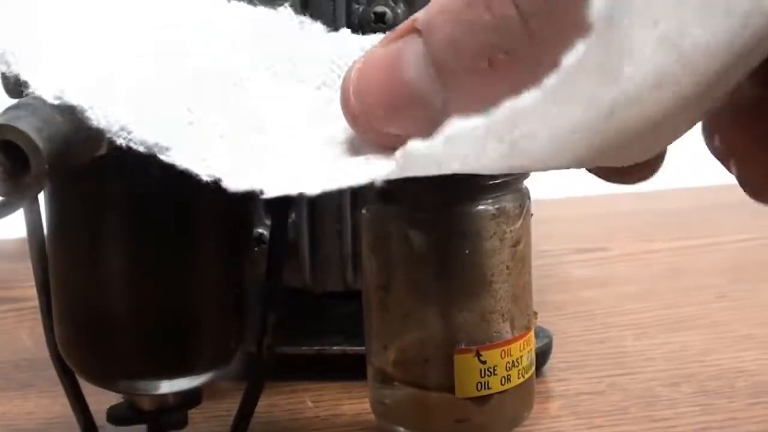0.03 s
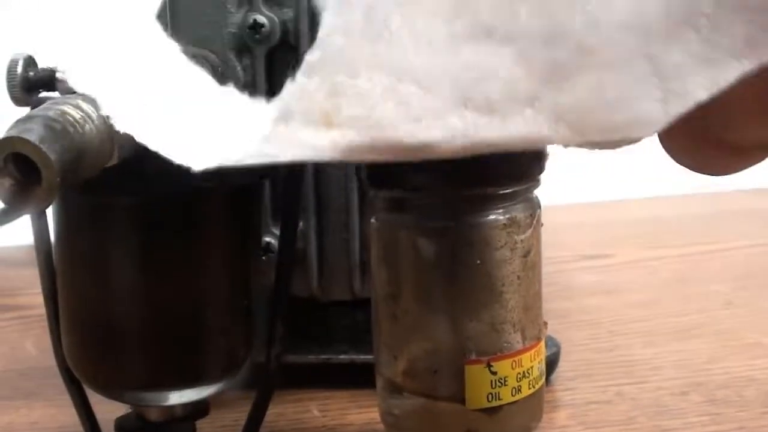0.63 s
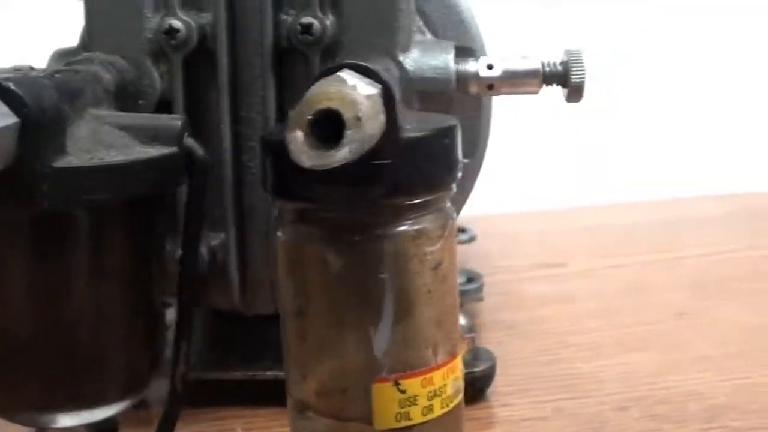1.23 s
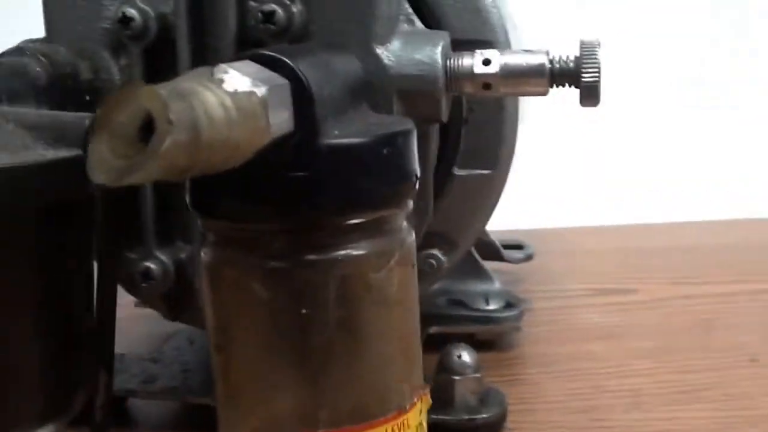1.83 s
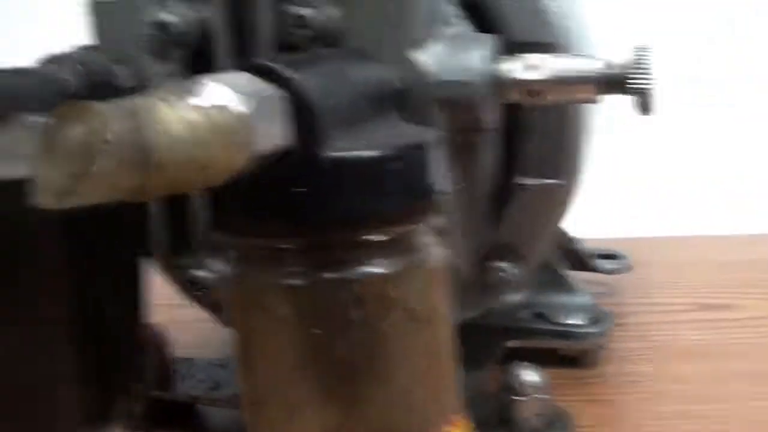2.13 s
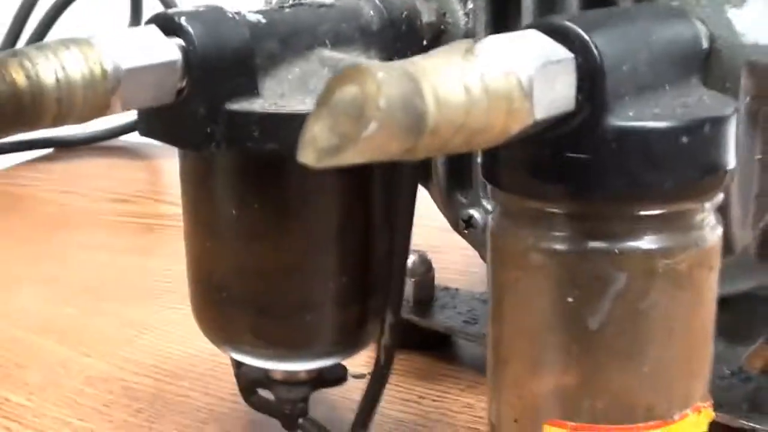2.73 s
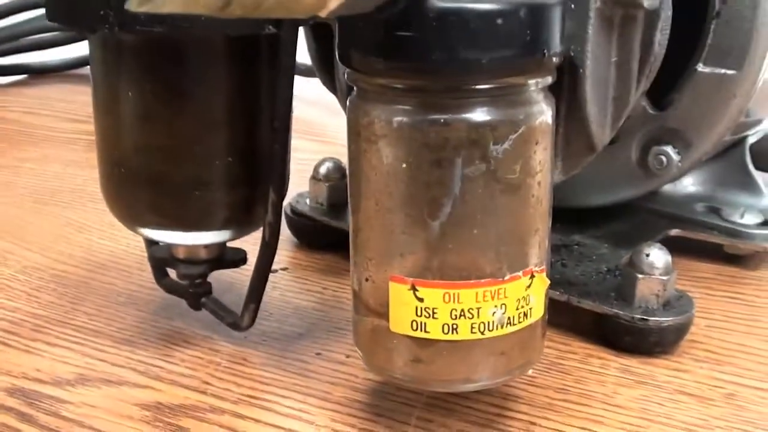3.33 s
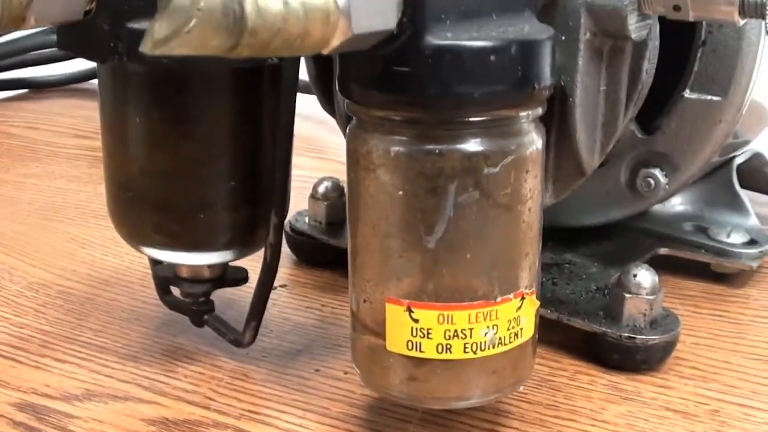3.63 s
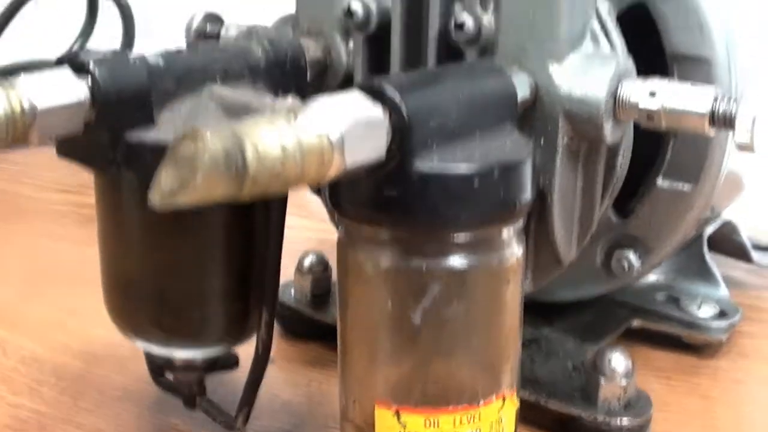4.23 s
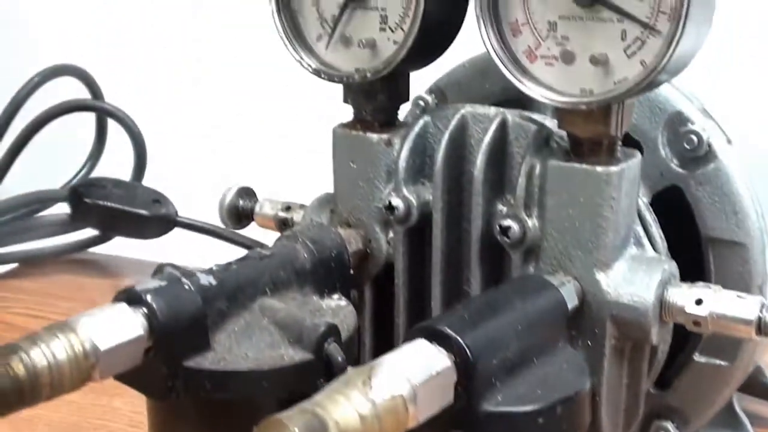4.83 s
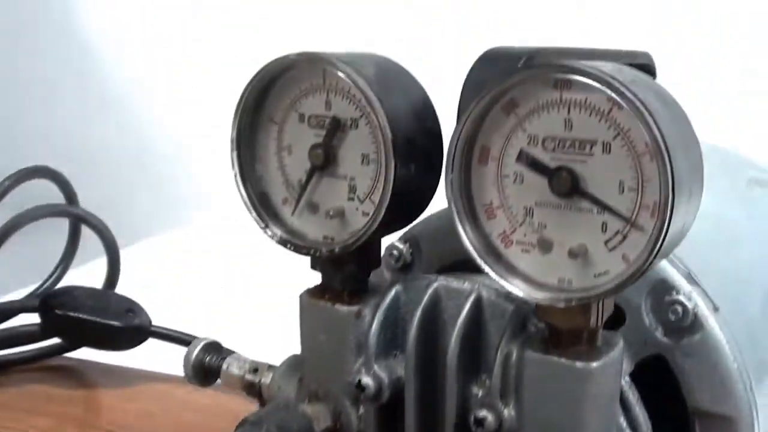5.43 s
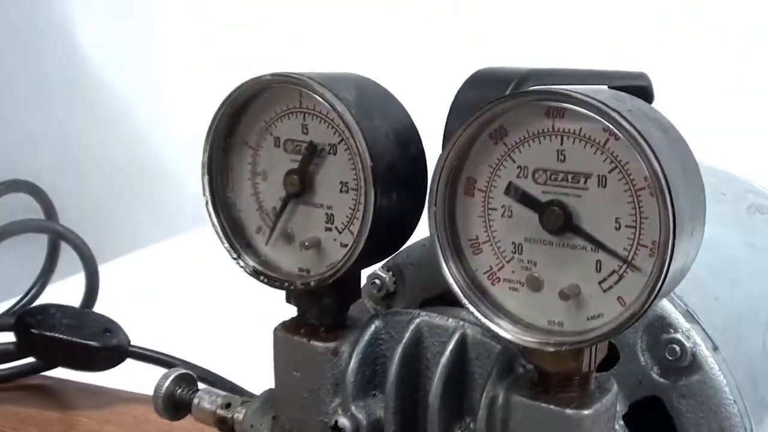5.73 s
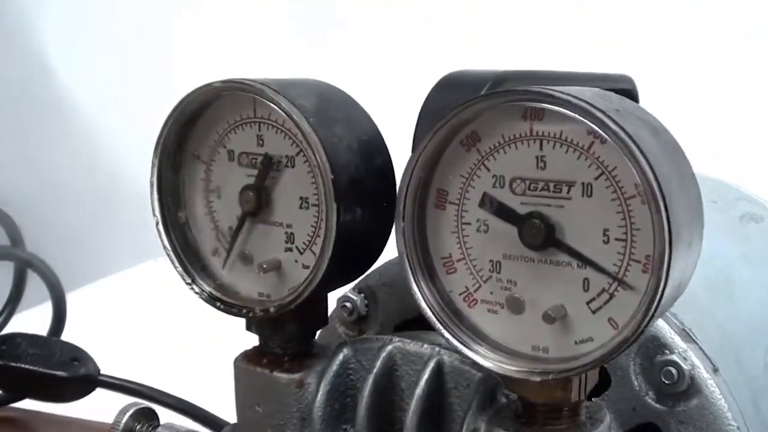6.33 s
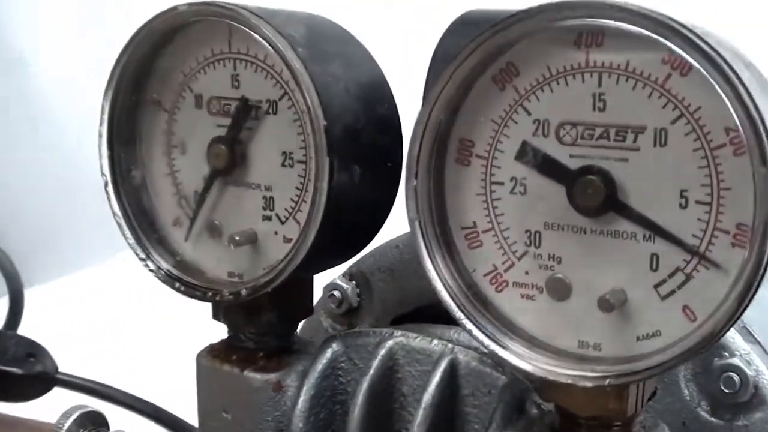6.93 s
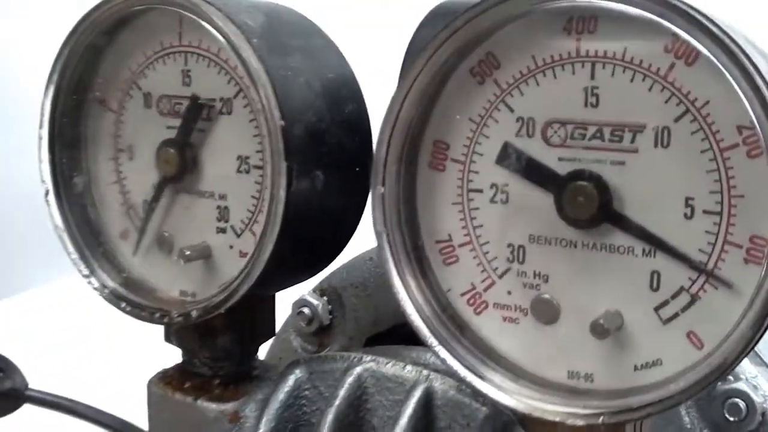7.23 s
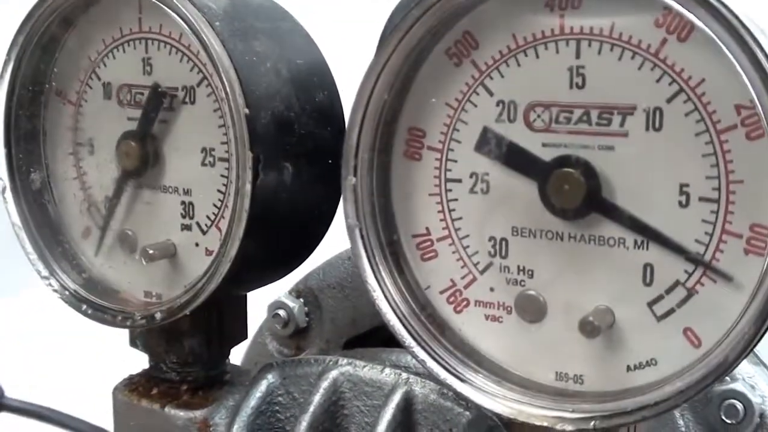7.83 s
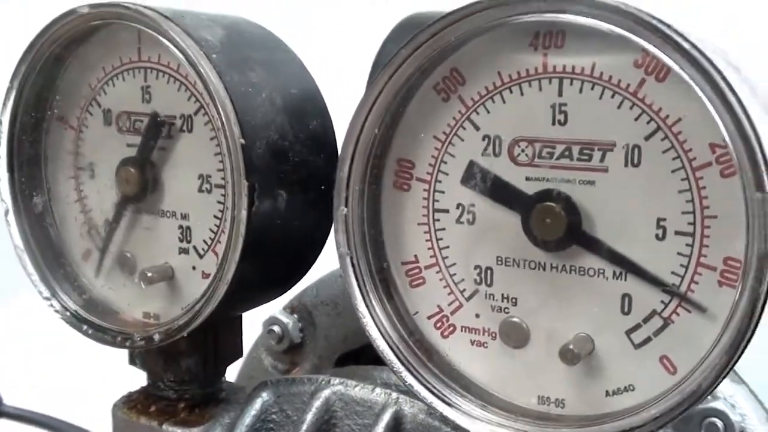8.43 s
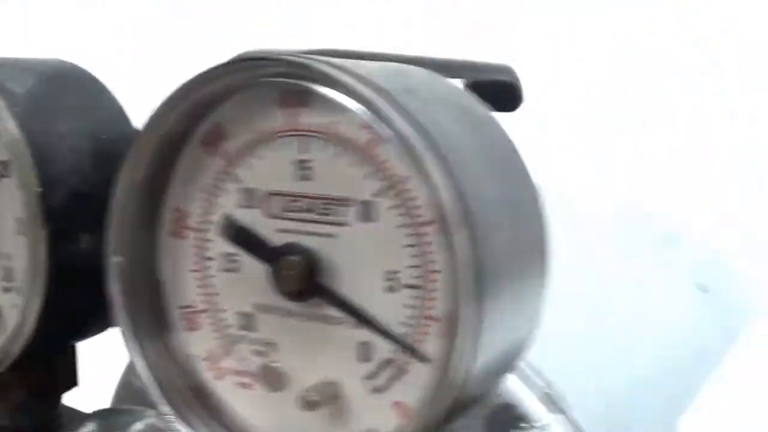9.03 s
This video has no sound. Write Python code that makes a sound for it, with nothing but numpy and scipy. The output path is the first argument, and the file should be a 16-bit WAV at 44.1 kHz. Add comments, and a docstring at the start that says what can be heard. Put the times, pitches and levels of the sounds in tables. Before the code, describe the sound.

An electric vacuum pump is already running on a table indoors and holds one speed for the whole nine seconds or so. The loudest sound is a low, buzzing drone made of very rapid air thumps. Each thump carries a spit of air, forming a bright, pulsing hiss with thin, high ringing from the jar and metal fittings. Beneath it are fast ticking and scraping, a faint wavering motor whine and a soft fan rush.

From the start until about 1.1 seconds, a paper towel flutters and rasps in the exhaust. The hiss sounds hollow and close until about 2 seconds, then is strongest around 3 to 4 seconds. From about 4.5 seconds the microphone rises away from the outlet; the hiss changes colour and the ticking grows a little clearer. The drone continues to the end, with slight room echo.

```python
"""On a wooden table, a four-vane vacuum pump blows out through an open hose barb on its oil jar.
Each turning vane lets out a thump and a spit of air, which hisses and rings the jar and fittings.
The vanes tick and scrape, the motor whines and a cooling fan rushes underneath.
A paper towel flutters in the exhaust for the first second; later the microphone moves
from the outlet up to the gauges."""
import sys
import numpy as np
from scipy import signal
from scipy.fft import rfft, irfft, next_fast_len
from scipy.io import wavfile
from scipy.ndimage import uniform_filter1d, map_coordinates

SR = 44100
rng = np.random.default_rng(int(sys.argv[2]) if len(sys.argv) > 2 else 0)


def unload_audio(sound):
    """Save the sound as a 16-bit wav file, at the path given as the first command line argument."""
    columns = np.transpose(np.atleast_2d(sound))
    # keep every value between -1 and 1, then stretch to whole-number steps
    steps = np.round(np.clip(columns, -1, 1) * 32767)
    wavfile.write(sys.argv[1], SR, steps.astype(np.int16))


N = 405719
TIME = np.arange(N) / SR


# How many vanes pass the exhaust each second: time_s, rate_hz
VANE_RATE = [(0, 117.72), (1.5, 117.9), (5, 117.98), (9.2, 117.88)]
# How the four vanes differ: tick_lag_ms, tick_level_db, thump_lag_ms
VANES = [(-0.4, -4, -0.0076), (-0.072, -3.5, -0.034), (-0.22, -5, -0.023), (-0.52, -1.5, 0.0091)]
def rotor():
    """The motor turns the vanes; one after another they uncover the exhaust."""
    (rate_hz,) = curves(VANE_RATE)
    passes = 1 / 6 + np.cumsum(rate_hz) / SR
    count = np.arange(1, int(passes[-1]) + 1)
    times = np.interp(count, passes, TIME)
    return rate_hz, passes, times, np.array(VANES)[count % len(VANES)].T


# Tone of one thump through jar and outlet: pitch_hz, ahead_db, aside_db
THUMP_TONE = [(30.2, -61, -50), (69.6, -25, -49), (109.4, -6.5, -6), (213, 7, 6), (349, 7, 5),
              (483, 0.5, -4), (623, -1, -11.5), (610, -11, -35.5), (842, -9.5, -11.5), (1030, -22, -39),
              (1353, -12.5, -26), (1980, -39.5, -25.5), (4900, -60.5, -65)]
# How the drone of thumps swells and fades: time_s, level_db
DRONE_LEVEL = [(0.0, -28), (0.07, -29), (0.51, -28.5), (0.61, -30), (1.69, -28.5), (2.0, -31),
               (3.56, -28.5), (4.28, -30), (7.66, -30), (7.84, -29.5), (7.92, -31.5), (8.43, -29),
               (8.71, -32), (8.76, -30), (9.17, -29.5), (9.2, -32)]
def thumps(times, facing, boost_db=.24):
    """Each chamber empties with a push of air, never quite the same; together they make a drone."""
    timing, size = rng.standard_normal((len(times), 2)).T
    pulses = clicks(times + .028 * timing / 1000, .6 * size)
    tone = np.array(THUMP_TONE)
    ahead, aside = (unit_in(colour(pulses, tone[:, [0, k]]), 180, 430) for k in (1, 2))
    surge_db = .52 * wobble(19)  # the flow is a little uneven
    return (facing * ahead + (1 - facing) * aside) * loudness(DRONE_LEVEL) * undb(surge_db + boost_db)


# Puffs that come out harder: start_s, level_db
HARD_PUFFS = [(2.79, 5), (3.82, 4), (4.43, 6), (7.555, 6), (8.439, 6), (8.546, 3)]
def sputters():
    """Now and then the outlet gives a small dull pop that rings the housing."""
    tone = [(60, -16), (150, -4), (300, 0), (550, -4), (1100, -9), (1950, -19), (2160, 0),
            (2400, -16), (5000, -32)]
    return colour(clicks(*np.transpose(HARD_PUFFS)), tone)


def spits(times, fall_s, leak, rise_s=.00048, scatter_db=2):
    """How hard the air swirls: it bursts out with each vane, then dies down to a steady leak."""
    t = TIME[:SR // 50]
    burst = (1 - np.exp(-t / rise_s)) * np.exp(-t / fall_s)
    starts = clicks(times, scatter_db * rng.standard_normal(len(times)))
    return signal.oaconvolve(starts, burst / burst.max())[:N] + leak


# Tone of the air jet at the outlet's mouth, in front of it and from above: pitch_hz, level_db
JET_CLOSE = [(300, -6), (850, 4), (1250, -5.5), (2000, -7), (3300, 1.5), (4450, -5), (4700, -6),
             (5100, 0.5), (5750, -3), (6350, 1), (6650, -12), (7000, -4), (7550, -4), (8050, 9),
             (8650, 2.5), (9300, 1.5), (10150, -1), (10750, -3.5), (11200, -8), (11550, -3), (12000, -14),
             (12550, -2), (13700, -5), (14200, -10)]
JET_FRONT = [(300, -13), (850, -7.5), (1250, -4.5), (2050, -13), (2550, -4.5), (2950, -14), (3450, -5.5),
             (4600, -15), (5400, -0.5), (6400, -10.5), (7100, -3), (7800, 3), (9000, 0), (9500, -1.5),
             (10200, -8), (10800, -11), (11300, -6), (13500, -17), (14300, -21), (15000, -29)]
JET_ABOVE = [(300, -19), (1200, -12), (1800, -6), (2700, -8), (3600, -6.5), (4700, -1.5), (5600, -10),
             (7150, 7.5), (7600, 1.5), (8700, -1.5), (9600, 3.5), (10900, 4.5), (11700, -4), (13600, -8),
             (15000, -34)]
# How the hiss swells and fades: time_s, level_db
HISS_LEVEL = [(0.0, -40), (0.13, -55), (0.71, -46), (1.6, -44.5), (2.5, -46), (3.0, -39.5), (4.0, -38.5),
              (4.25, -44), (5.51, -41), (8.56, -43.5), (9.2, -42)]
def jet(times, height, boost_db=.8):
    """Air hisses out of the outlet: hollow up close, then changing tone with the listening height."""
    air = eddies(spits(times + .00027, fall_s=.0012, leak=.21, rise_s=.00014))
    tones = JET_CLOSE, JET_FRONT, JET_ABOVE
    close, front, above = (unit_in(colour(air, tone), 6600, 8920) for tone in tones)
    near = held(-np.inf, end_s=2.2, move_s=.6)  # the microphone draws away from the mouth
    far = (1 - height) * front + height * above
    return (near * close + (1 - near) * far) * loudness(HISS_LEVEL) * undb(boost_db)


# How loud the housing rings: time_s, level_db
HOUSING_LEVEL = [(0.05, -47), (0.33, -49), (0.45, -44.5), (0.7, -51), (1.1, -55), (1.7, -55), (2.6, -52),
                 (3.1, -68), (4.0, -59), (4.4, -50.5), (5.0, -49), (5.35, -45), (6.4, -47.5), (7.0, -51),
                 (9.2, -50.5)]
def housing_ring(spit):
    """The spits of air ring the pump's housing."""
    return blown_ring(spit, hz=2158, width_hz=112) * loudness(HOUSING_LEVEL)


# How loud the oil jar rings: time_s, level_db
JAR_LEVEL = [(0.3, -50), (0.8, -46), (1.35, -53), (1.8, -47), (2.7, -46), (3.35, -42.5), (4.0, -45),
             (4.7, -48), (5.2, -58), (5.7, -50), (6.2, -52), (6.7, -48), (7.6, -56), (8.2, -53), (8.7, -60),
             (9.1, -52)]
def jar_ring(spit, scrape, hz=3752, width_hz=112):
    """Air and scraping ring the oil jar, which also sings in step with the vanes."""
    sung = ring(steep_ring(spit, hz, width_hz), hz, 10 * width_hz)
    blown = blown_ring(spit, hz, width_hz)
    scraped = steep_ring(scrape, hz, width_hz)
    return unit(blown + .45 * scraped + .19 * sung) * loudness(JAR_LEVEL)


# How loud the elbow rings: time_s, level_db
ELBOW_LEVEL = [(0.3, -58), (0.85, -51), (1.3, -44), (1.65, -50), (2.4, -46), (4.0, -54), (4.7, -51),
               (5.5, -45.5), (6.3, -46), (7.1, -49), (8.55, -49.5), (8.9, -41.5), (9.2, -41.5)]
def elbow_ring(spit):
    """The spits of air ring the bend in the pipe."""
    return blown_ring(spit, hz=5165, width_hz=170) * loudness(ELBOW_LEVEL)


# How loud the gauge stems ring as the microphone rises past them: time_s, level_db
STEM_LEVEL = [(0.3, -55), (1.9, -53), (2.3, -53), (4.0, -56), (4.5, -48.5), (5.5, -47), (6.3, -51),
              (9.2, -51)]
def stem_ring(spit, scrape, hz=4228, width_hz=88):
    """Air and scraping ring the stems of the gauges."""
    blown = blown_ring(spit, hz, width_hz)
    scraped = steep_ring(scrape, hz, width_hz)
    return unit(blown + .75 * scraped) * loudness(STEM_LEVEL)


# Small hollows in the fittings: pitch_hz, width_hz, front_db, halfway_db, above_db
HOLLOWS = [(1090, 81, -75, -59, -46), (1740, 200, -65, -56, -59), (3240, 210, -77, -53.5, -50.5),
           (6280, 240, -63, -45.5, -48.5), (6890, 330, -50.5, -46.5, -66)]
def hollow_rings(spit, height):
    """Small hollows ring faintly, each loudest from its own direction; the towel muffles them."""
    rings = sum(blown_ring(spit, hz, width) * heard_from(height, db) for hz, width, *db in HOLLOWS)
    muffle_db = sum(db * held(start, end, TOWEL_MOVE_S) for start, end, _, db in TOWEL_HOLDS)
    return rings * undb(muffle_db)


# How the hose barb's ring swells and fades: time_s, level_db
BARB_LEVEL = [(0.0, -47), (0.25, -52), (0.56, -43), (1.15, -44), (1.5, -50), (1.71, -41), (2.7, -44.5),
              (2.92, -52), (3.23, -46), (4.0, -53), (4.4, -41.5), (4.82, -45), (5.2, -58), (5.6, -48),
              (6.3, -44), (6.8, -45), (7.3, -49.5), (8.4, -43.5), (8.94, -45), (9.2, -51)]
def barb_ring(spit, boost_db=2):
    """The hose barb, a short open nozzle, rings along its length."""
    return blown_ring(spit, hz=6062, width_hz=130) * loudness(BARB_LEVEL) * undb(boost_db)


# The outlet's sizzle, pushed higher by the towel: time_s, pitch_hz, level_db
SIZZLE = [(0.0, 12900, -48), (0.3, 13250, -54), (0.5, 12800, -46), (0.8, 12700, -46), (1.2, 12800, -50),
          (1.65, 12750, -50), (1.9, 12800, -60), (2.4, 12300, -49), (2.7, 12750, -54), (4.3, 12900, -54),
          (4.65, 12750, -51), (5.1, 12600, -52), (5.35, 12900, -53), (6.9, 12780, -59), (7.3, 12750, -57),
          (7.8, 12750, -65), (9.2, 12750, -54)]
def sizzle(spit, upper_hz=13650, width_hz=400, boost_db=.5):
    """Air rings across the narrow outlet at two very high pitches; the lower one glides."""
    hz, db = curves(SIZZLE)
    upper = ring(ring(eddies(spit), upper_hz, width_hz), upper_hz, width_hz)
    lower = gliding_ring(spit, hz, width_hz)
    return (lower + undb(-5) * upper) * undb(db + boost_db)


# The jet's wandering ring, broad rush and thin top: time_s, pitch_hz, level_db
JET_WANDER = [(0.35, 5370, -56), (0.7, 5560, -50), (1.3, 5630, -51), (1.8, 5540, -53), (2.4, 5460, -51),
              (3.5, 5440, -50), (4.5, 5410, -48.5), (6.2, 5380, -51.5), (9.2, 5300, -52)]
JET_RUSH = [(0.3, 8640, -50), (0.7, 8600, -45), (1.35, 8400, -46.5), (1.8, 8500, -42.5), (2.5, 8360, -40.5),
            (2.8, 8550, -51), (2.95, 8950, -50), (4.0, 8700, -42.5), (4.6, 8770, -41), (5.5, 8670, -39.5),
            (6.5, 8800, -40), (7.6, 8600, -40.5), (8.6, 8630, -41), (9.1, 8550, -52)]
JET_TOP = [(0.4, 10730, -46), (0.75, 10500, -55), (1.6, 10500, -48.5), (2.75, 10770, -45),
           (3.3, 10800, -57), (4.0, 10800, -47), (4.3, 10570, -45), (5.4, 10500, -48), (6.5, 10160, -47),
           (6.85, 10900, -54), (8.8, 10800, -50), (9.15, 10800, -44)]
def jet_rings(spit):
    """Three bands of the jet's hiss swell and shift as the microphone moves."""
    out = 0
    for table, width_hz in (JET_WANDER, 260), (JET_RUSH, 600), (JET_TOP, 420):
        hz, db = curves(table)
        out += gliding_ring(spit, hz, width_hz) * undb(db)
    return out


# Tone of the ticks through the casing: pitch_hz, level_db
TICK_TONE = [(200, -29), (550, -14.5), (800, 2), (980, -4), (1120, -1), (1300, 0), (1500, -1.5),
             (1720, -0.5), (2000, -16.5), (2600, -3.5), (4000, -20), (9000, -45)]
def ticks(times, vane_db, height):
    """The vanes slap the chamber wall in a pattern that repeats with every turn."""
    timing, size = rng.standard_normal((len(times), 2)).T
    slaps = clicks(times + .022 * timing / 1000, vane_db + 1.2 * size)
    return unit_in(colour(slaps, TICK_TONE), 840, 3200) * heard_from(height, db=(-51, -55.5, -43))


# Tone of the scraping through the casing: pitch_hz, level_db
SCRAPE_TONE = [(200, -10), (400, 3), (600, 1), (900, -1), (1400, -4), (1800, -4), (2000, -12), (2500, -13),
               (3200, -8), (4500, -9), (7000, -24)]
def scraping(passes, times):
    """Vanes drag over the same rough spots each turn; gives the bare scrape and its muffled sound."""
    drag = spits(times - .0004, fall_s=.0012, leak=.2, rise_s=.0002, scatter_db=.7)
    turns = passes / len(VANES)
    wall = rng.standard_normal(int(N / turns[-1]))  # the bumps of one full turn
    bumps = map_coordinates(wall, [turns % 1 * len(wall)], order=3, mode="mirror")
    scrape = unit(drag * bumps)
    return scrape, unit(colour(scrape, SCRAPE_TONE)) * undb(-47)


# Tones of the motor and bearings: pitch_hz, front_db, above_db
WHINE_TONES = [(796, -59, -61), (1073, -66, -58), (1096, -60, -55.5), (1120, -63, -62), (1149, -64, -63),
               (1179, -59, -60), (1268, -58, -63), (1357, -63, -67), (1415, -58, -56), (1435, -63, -69),
               (1533, -58, -56), (1651, -63, -60), (1676, -64, -56), (1698, -66, -57.5), (1768, -64, -57),
               (1879, -64, -72), (1887, -72, -57)]
def whine(rate_hz, height):
    """The motor's wavering tones follow the speed of the shaft."""
    phase_per_hz = 2 * np.pi * np.cumsum(rate_hz / rate_hz.mean()) / SR
    out = 0
    for hz, front_db, above_db in WHINE_TONES:
        tone = np.sqrt(2) * np.sin(hz * phase_per_hz + .3 * wobble(12))
        out += tone * undb(2 * wobble(7) + front_db + height * (above_db - front_db))
    return out


TOWEL_MOVE_S = .064  # time the hand takes to move the paper in or away
# When the towel is held in the exhaust: start_s, end_s, rasp_db, muffle_db
TOWEL_HOLDS = [(0.09, 0.52, -45, -6.5), (0.52, 1.087, -50, -1)]
# How loud the towel's low flutter is: time_s, level_db
FLUTTER_LEVEL = [(0, -42), (.12, -46), (.33, -46), (.45, -41.5), (.77, -41.5), (.86, -45), (.92, -40.5),
                 (1.02, -42), (1.17, -57), (1.4, -100)]
def towel(times):
    """The exhaust shakes the paper in low gusts; held close, it rasps and buzzes with every puff."""
    gust_tone = [(20, -14), (50, 0), (90, 5), (160, 6), (280, .5), (600, -13), (2000, -48)]
    paper_tone = [(200, -14), (740, 8), (1000, -5), (1150, 3.5), (1700, 0), (1950, -6), (2170, -3),
                  (2550, -23), (3250, -3), (4200, -2), (4700, -12), (7800, -9), (9600, 4), (12000, -23)]
    gusts = unit(colour(rng.standard_normal(N), gust_tone))
    air = unit(eddies(spits(times, fall_s=.0042, leak=.26)))
    slaps = unit(clicks(times + .000505, rng.standard_normal(len(times))))
    rasp = unit(colour(air + .73 * slaps, paper_tone))
    flutter = gusts * loudness(FLUTTER_LEVEL) * undb(2 * wobble(30.3))
    holding = sum(held(start, end, TOWEL_MOVE_S) * undb(db) for start, end, db, _ in TOWEL_HOLDS)
    return flutter + rasp * holding


# Tone of the fan and the shaking table: pitch_hz, level_db
FAN_TONE = [(20, -28), (45, -28), (70, -16), (120, -10.5), (300, -4), (550, -10), (750, -15.5), (1000, -17),
            (4000, -20), (9000, -23), (12000, -32)]
def fan():
    """The cooling fan rushes softly over the dull shaking of the table."""
    wash = unit(colour(rng.standard_normal(N), FAN_TONE))
    return wash * undb(-44.7 + 1.6 * wobble(20))


def near_echo(x, facing, aside_ms=.458, ahead_ms=.194, share=.36):
    """The nearest echo comes later as the microphone leaves the line of the outlet."""
    lag_ms = aside_ms + facing * (ahead_ms - aside_ms)
    late = map_coordinates(x, [np.arange(N) - lag_ms * SR / 1000], order=3)
    return (x + share * late) / np.hypot(1, share)


def room(x, wet_db, spread, early_s=.016, tail_db=-14, tail_s=.62, shift_s=1.2):
    """Table and walls add echoes that shift as the microphone moves; spread widens them."""
    t = TIME[:SR // 3]
    fade = (np.exp(-t / early_s) + undb(tail_db - 60 * t / tail_s)) * (t > .001)
    wet = np.zeros((2, N + len(t)))
    step = int(shift_s * SR)
    for centre in range(0, N + step, step):  # each echo pattern blends into the next
        mid, side = rng.standard_normal((2, len(t))) * fade / np.sqrt(np.sum(fade ** 2))
        echoes = np.array([mid + spread * side, mid - spread * side]) / np.hypot(1, spread)
        near = np.arange(max(centre - step, 0), min(centre + step, N))
        piece = x[near] * np.cos(np.pi / 2 * (near - centre) / step)
        echoed = signal.fftconvolve(piece[None], echoes, axes=1)
        wet[:, near[0]:near[0] + echoed.shape[1]] += echoed
    return (x + undb(wet_db) * wet[:, :N]) / np.hypot(1, undb(wet_db))


def left_first(x, phase_rad=.23):
    """What to add to a sound so it reaches the left a little early and the right a little late."""
    wave = signal.hilbert(x, next_fast_len(N))[:N]
    return np.real(wave * np.exp(.5j * phase_rad * np.array([[1], [-1]]))) - x


def lean_left(x, pan_db, bass_hz=230):
    """Make the left side louder, leaving the bass in the middle."""
    bass = signal.sosfiltfilt(signal.butter(2, bass_hz, fs=SR, output="sos"), x)
    return bass + (x - bass) * undb(np.array([pan_db, -pan_db]) / 2)


def eddies(strength):
    """Swirling air: fresh noise that follows the given strength."""
    return strength * rng.standard_normal(N)


def ring(x, hz, width_hz):
    """Make a sound ring around one pitch, at level 1."""
    return unit(signal.lfilter(*signal.iirpeak(hz, hz / width_hz, SR), x))


def steep_ring(x, hz, width_hz):
    """A ring that lets less through on either side of its pitch."""
    return ring(ring(x, hz, width_hz), hz, 5 * width_hz)


def blown_ring(spit, hz, width_hz):
    """Trapped air rings when the spits blow on it."""
    return steep_ring(eddies(spit), hz, width_hz)


def gliding_ring(spit, hz, width_hz):
    """A blown ring whose pitch moves: shift the noise down, smooth it, shift it back."""
    spin = np.exp(2j * np.pi * np.cumsum(hz) / SR)
    band = signal.lfilter(*signal.butter(2, width_hz / 2, fs=SR), eddies(spit) / spin)
    return unit(np.real(spin * band))


def colour(x, tone, size=4096):
    """Shape a sound with a list of (pitch_hz, level_db) points."""
    hz, db = np.transpose(tone)
    f = np.maximum(np.fft.rfftfreq(size, 1 / SR), 1)
    cepstrum = irfft(np.log(undb(np.interp(np.log(f), np.log(hz), db))))
    cepstrum[1:size // 2] *= 2  # folded so the filter rings only after a hit
    cepstrum[size // 2 + 1:] = 0
    return signal.oaconvolve(x, irfft(np.exp(rfft(cepstrum))))[:N]


def clicks(times, db, order=8):
    """Clean clicks at exact times, even between samples."""
    at = times[:, None] * SR
    index = np.floor(at).astype(int) + np.arange(1 - order, order + 1)
    shape = np.sinc(index - at) * np.sinc((index - at) / order) * undb(db)[:, None]
    inside = (index >= 0) & (index < N)
    return np.bincount(index[inside], shape[inside], N)


def wobble(rate_hz):
    """A smooth random drift, about 1 in size."""
    hold = int(SR / rate_hz)
    steps = np.repeat(rng.standard_normal(N // hold + 1), hold)
    return unit(uniform_filter1d(uniform_filter1d(steps, hold), hold)[:N])


def held(start_s, end_s, move_s):
    """Rise to 1 at the start, hold, and fall at the end."""
    return np.clip(np.minimum(TIME - start_s, end_s - TIME) / move_s + .5, 0, 1)


def heard_from(height, db):
    """Gain at the microphone's height, from the levels in front, halfway up and above."""
    return undb(np.interp(height, [0, .5, 1], db))


def curves(table):
    """Join a table's rows with straight lines in time."""
    time_s, *columns = np.transpose(table)
    return [np.interp(TIME, time_s, column) for column in columns]


def loudness(table):
    """Turn (time_s, level_db) rows into a changing gain."""
    return undb(curves(table)[0])


def undb(db):
    """Turn decibels into a gain."""
    return 10 ** (np.asarray(db) / 20)


def unit(x):
    """Scale a sound to an average (rms) level of 1."""
    return x / np.sqrt(np.mean(x ** 2))


def unit_in(x, low_hz, high_hz, size=2 ** 19):
    """Scale a sound so the part between two pitches has level 1."""
    f = np.fft.rfftfreq(size, 1 / SR)
    power = np.abs(rfft(x, size)[(f > low_hz) & (f < high_hz)]) ** 2
    return x / np.sqrt(power.sum() / (size // 2) / N)


# Where the microphone is: time_s, height (0 outlet, 1 gauges), facing (0 aside, 1 ahead of the outlet)
MICROPHONE_PATH = [(0, 0.47, 0.93), (.35, 0.52, 1.47), (.7, 0.45, 0.98), (1.6, 0.23, 1.03),
                   (2.1, 0.22, 1.03), (2.6, 0.29, 0.9), (3, 0.022, 0.94), (3.9, 0.067, 1.04),
                   (4.5, 0.37, 0.74), (5.3, 0.44, 0.61), (5.8, 0.59, 0.34), (6.5, 0.52, 0.28),
                   (7.3, 0.78, 0.13), (9.2, 0.82, 0.12)]
def scene():
    """The rotor drives thumps, ticks and spits; the moving microphone sets their balance."""
    height, facing = curves(MICROPHONE_PATH)
    rate_hz, passes, times, (tick_lag_ms, tick_db, thump_lag_ms) = rotor()
    drone = thumps(times + thump_lag_ms / 1000, facing) + sputters()
    machine = ticks(times + tick_lag_ms / 1000, tick_db, height) + whine(rate_hz, height)
    scrape, muffled_scrape = scraping(passes, times)
    hiss = jet(times, height)
    spit = spits(times + .000635, fall_s=.00076, leak=.16)  # air caught in the jar and fittings
    rings = housing_ring(spit) + jar_ring(spit, scrape) + elbow_ring(spit) + stem_ring(spit, scrape)
    rings += hollow_rings(spit, height) + barb_ring(spit) + sizzle(spit) + jet_rings(spit)
    clatter = near_echo(machine + muffled_scrape + hiss, facing) + rings
    pump = room(drone, wet_db=-23, spread=3) + left_first(drone) + room(clatter, wet_db=-7, spread=.85)
    towel_and_fan = room(towel(times) + fan(), wet_db=-7, spread=1)
    return lean_left(pump, pan_db=.6 + 1.7 * height) + towel_and_fan


def record(dry):
    """Cut off the very highest treble."""
    top_hz = 14400
    return signal.sosfilt(signal.ellip(8, .2, 70, top_hz, fs=SR, output="sos"), dry)


dry = scene()
out = record(dry)
unload_audio(out)
```